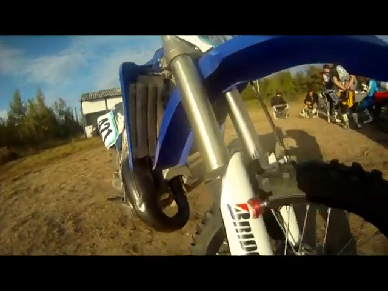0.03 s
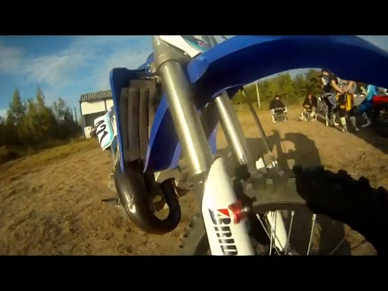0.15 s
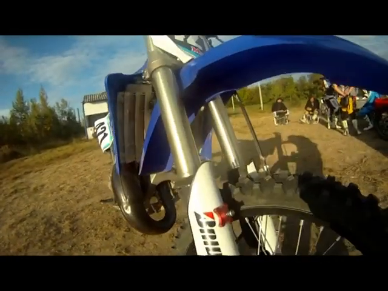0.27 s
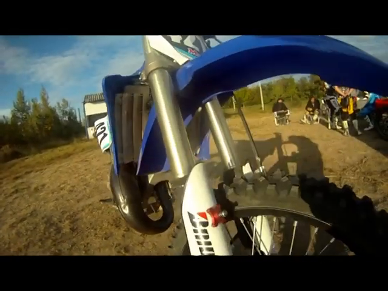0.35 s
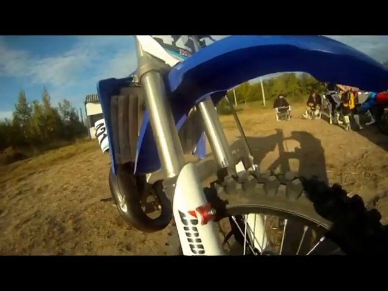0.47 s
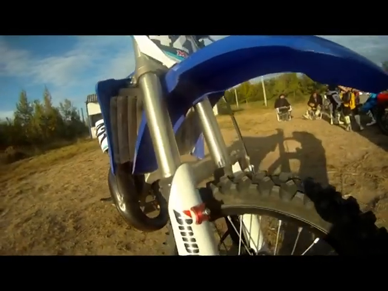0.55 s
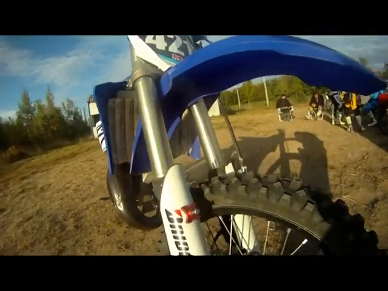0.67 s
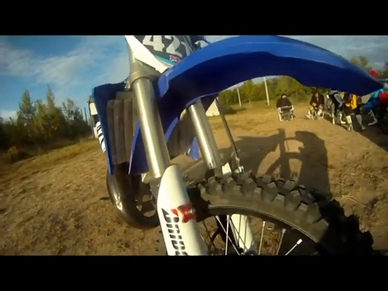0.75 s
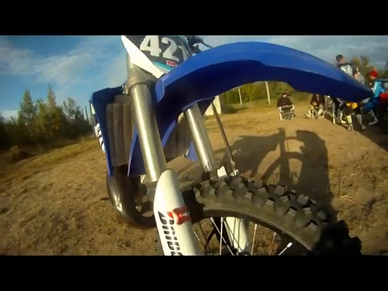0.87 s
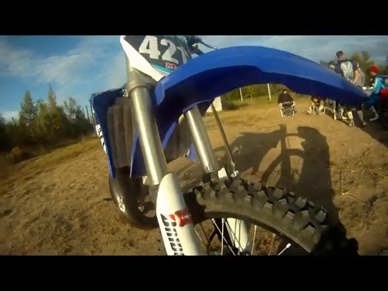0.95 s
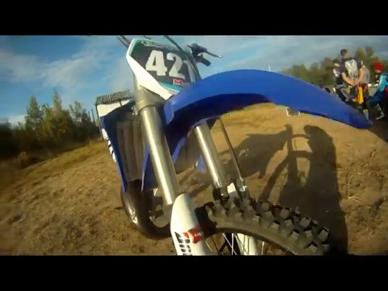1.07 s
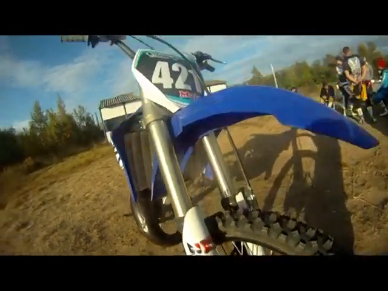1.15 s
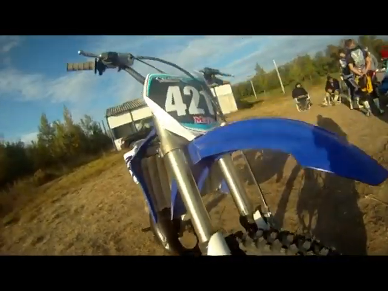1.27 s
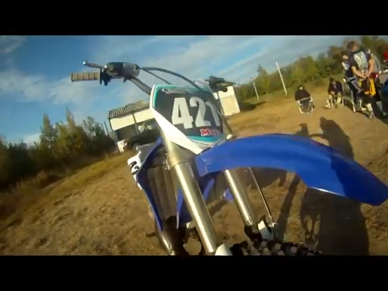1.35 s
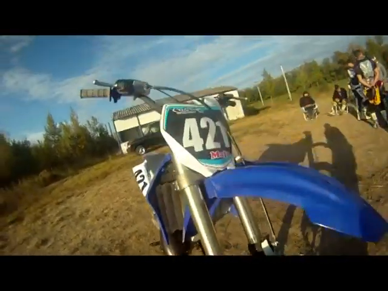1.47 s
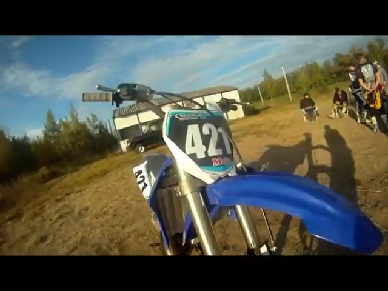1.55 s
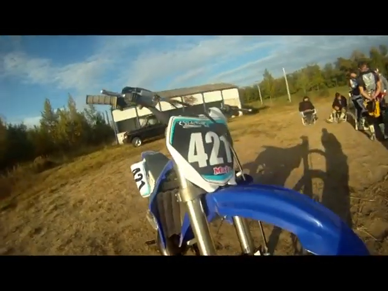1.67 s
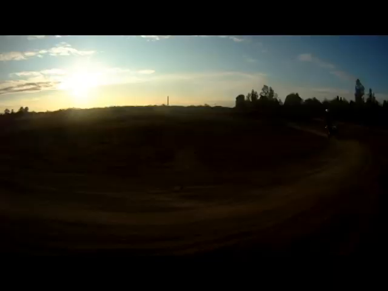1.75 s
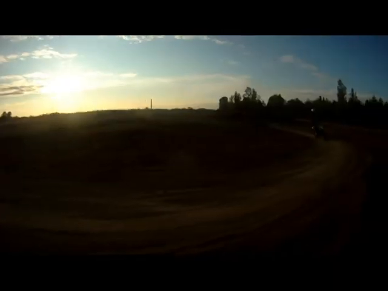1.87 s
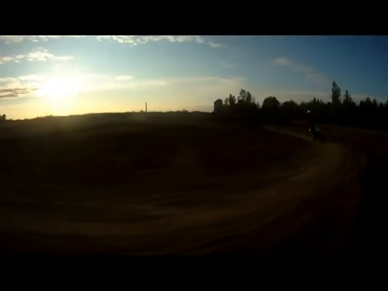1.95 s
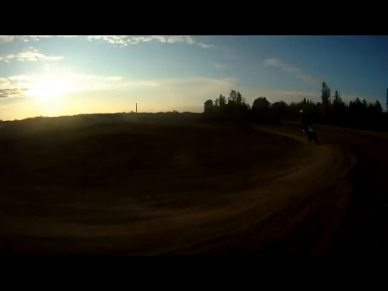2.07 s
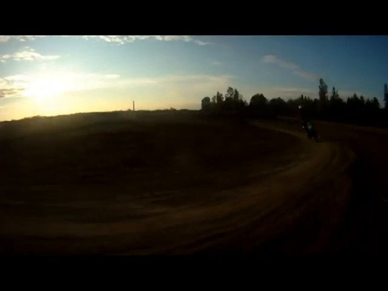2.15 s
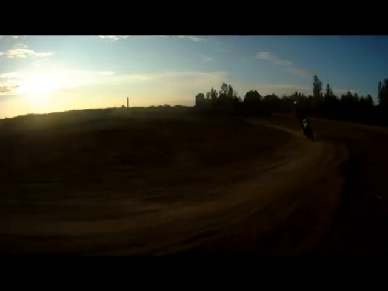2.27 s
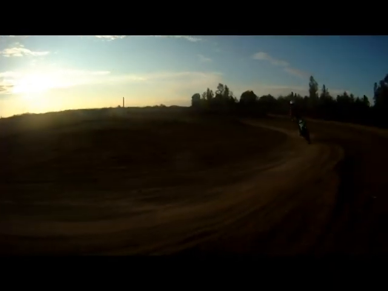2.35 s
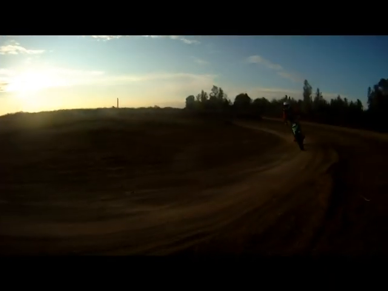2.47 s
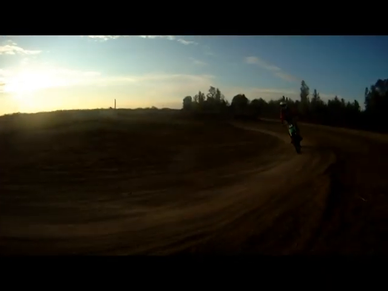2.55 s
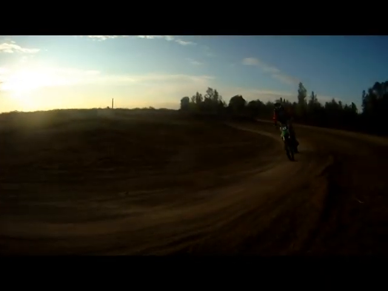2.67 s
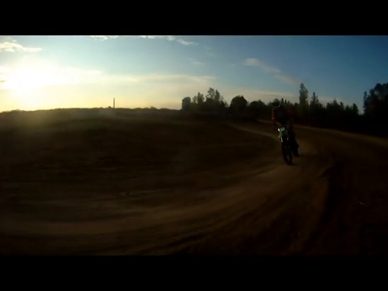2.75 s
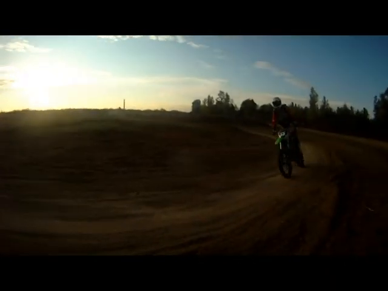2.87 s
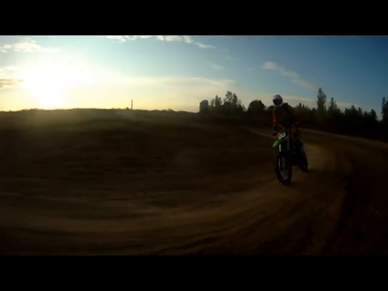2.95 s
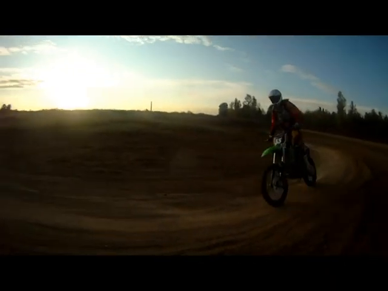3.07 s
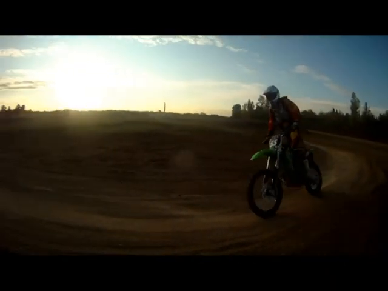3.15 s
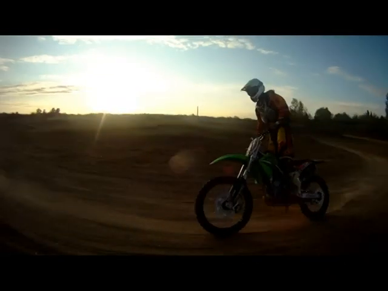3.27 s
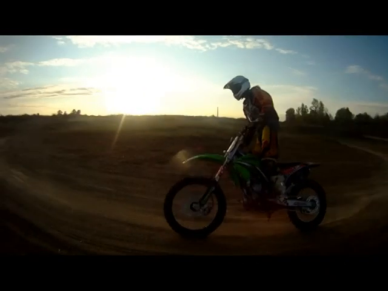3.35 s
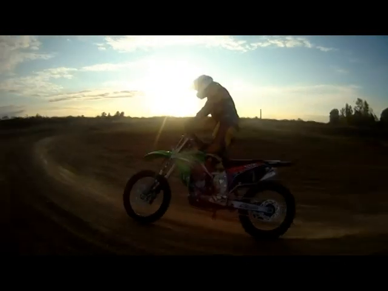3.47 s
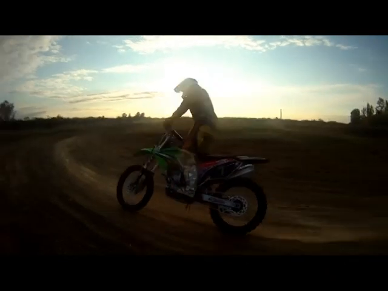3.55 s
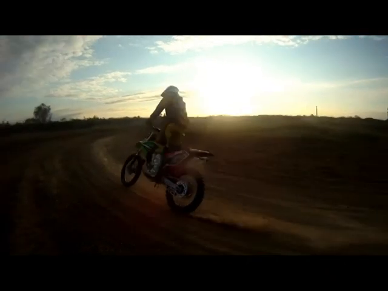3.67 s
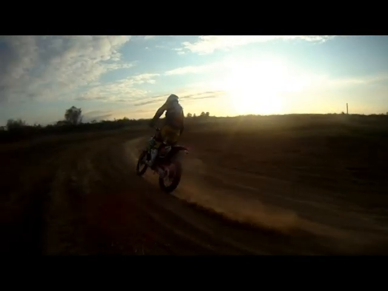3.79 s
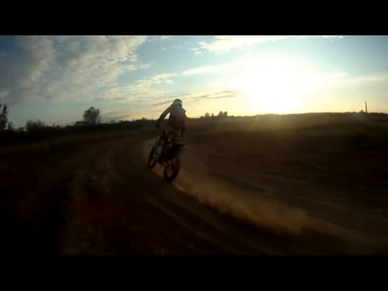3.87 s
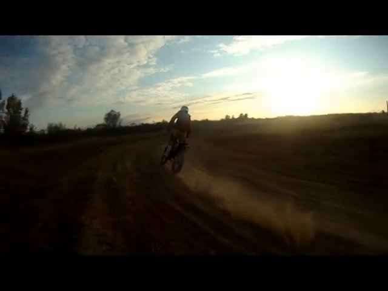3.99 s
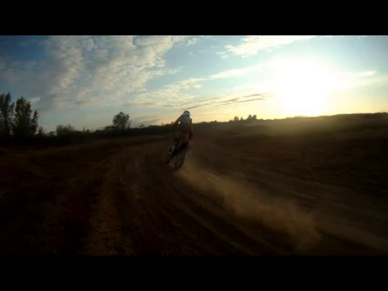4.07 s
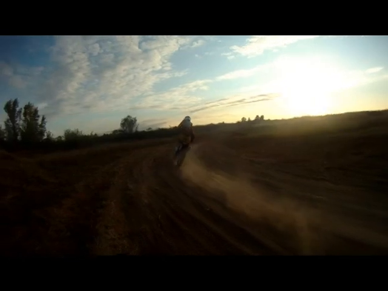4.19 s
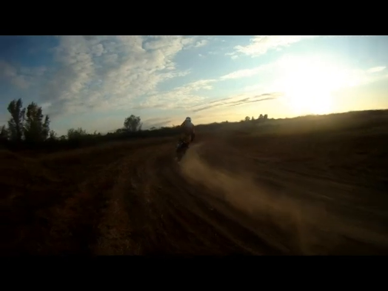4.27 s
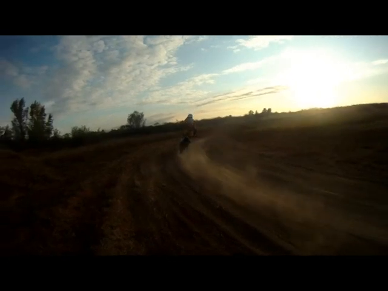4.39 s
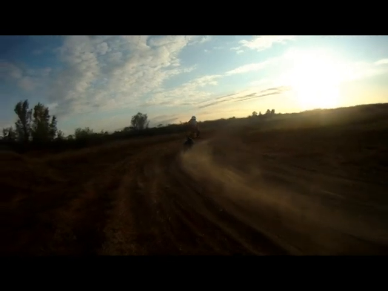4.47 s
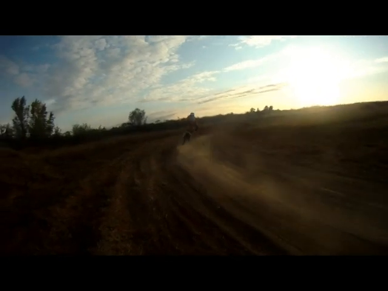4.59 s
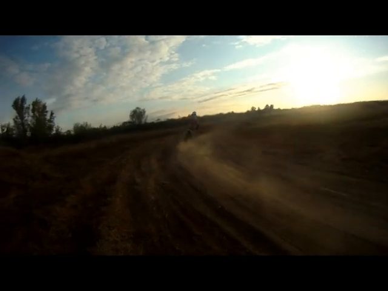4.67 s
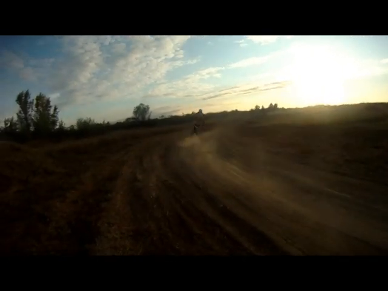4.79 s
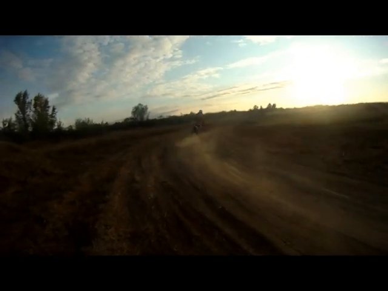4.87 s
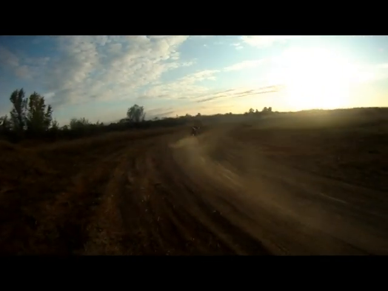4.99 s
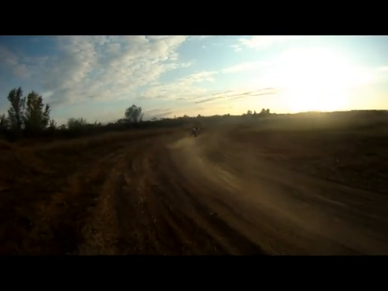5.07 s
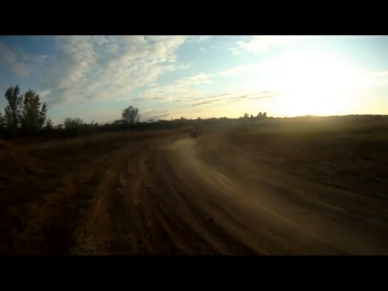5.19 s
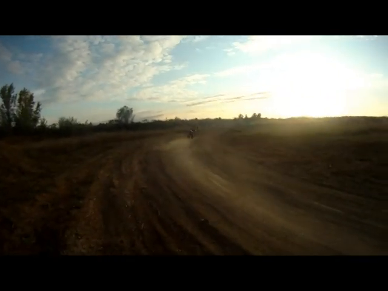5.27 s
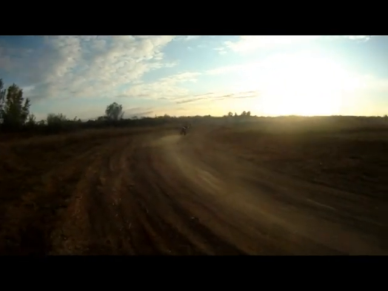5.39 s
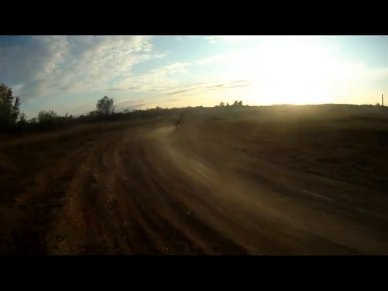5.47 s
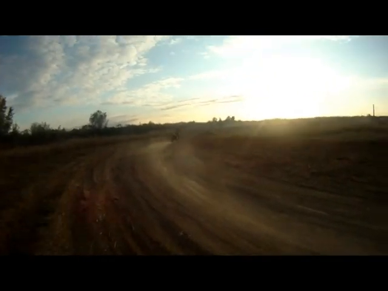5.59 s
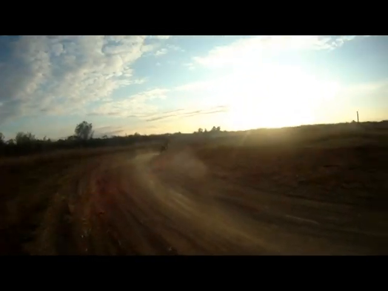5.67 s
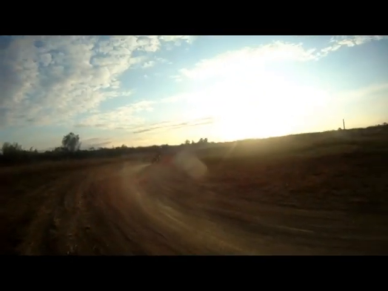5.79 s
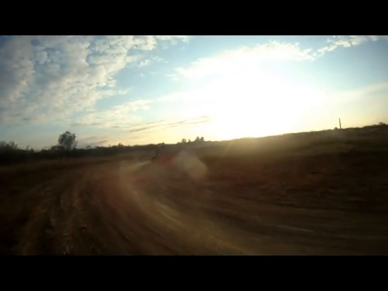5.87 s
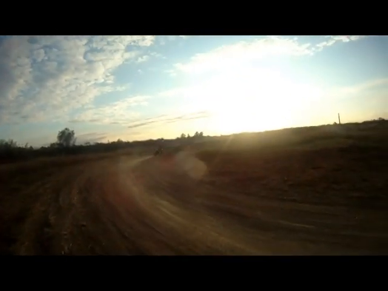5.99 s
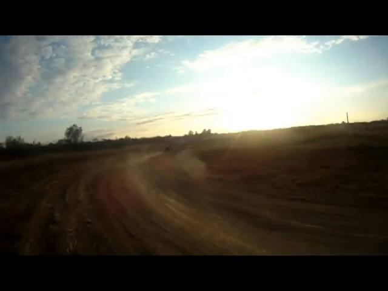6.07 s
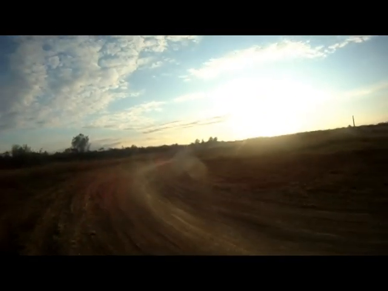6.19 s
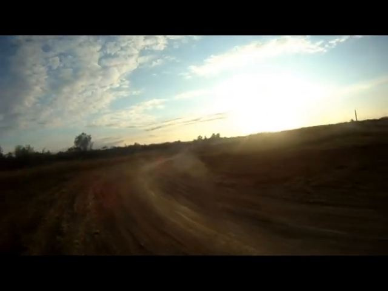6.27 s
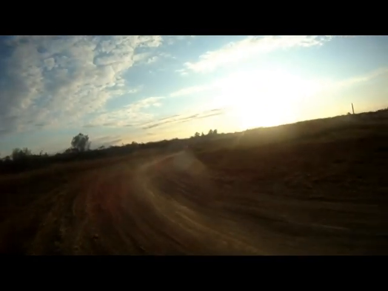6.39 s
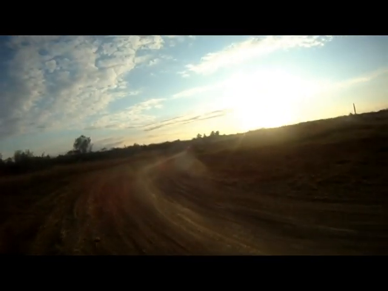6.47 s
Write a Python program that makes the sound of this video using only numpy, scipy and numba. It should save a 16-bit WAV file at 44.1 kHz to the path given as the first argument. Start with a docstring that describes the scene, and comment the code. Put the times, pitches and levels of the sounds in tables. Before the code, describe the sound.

Heard outdoors through a closed camera case, soft wind, rubbing cloth and a distant engine stop abruptly. After a tiny gap, a single-cylinder dirt bike thumps closer and revs loudly as it goes by. The throttle shuts, the exhaust stutters and pops, and the bike recedes with two short revs, a light spray of soil and a stone ticking on the case.

```python
"""A four-stroke single-cylinder dirt bike rides past, heard through the closed case of an action camera.
Each firing thumps the pipe and puffs out gas that rings the case. The bike rolls up, passes close with a
burst of throttle, burbles and pops on the overrun and leaves with two more blips, flinging dirt.
Before it, cut off by a short silence, comes a moment in the paddock: wind on the case, rustling cloth,
two soft knocks and another bike droning far off."""
import sys
import numpy as np
from scipy import signal
from scipy.fft import rfft, irfft
from scipy.io import wavfile
from scipy.ndimage import uniform_filter1d
from numba import njit

SR = 44100
rng = np.random.default_rng(int(sys.argv[2]) if len(sys.argv) > 2 else 0)


def unload_wav(signal):
    """Save mono or channel-first audio to the path in sys.argv[1] as 16-bit WAV at rate SR, clipped to [-1, 1]."""
    wavfile.write(
        sys.argv[1],
        SR,
        np.round(np.clip(np.atleast_2d(signal).T, -1, 1) * 32767).astype(np.int16),
    )


N = 288298
TIME = np.arange(N) / SR
PADDOCK_END_S, RIDE_START_S, RIDE_END_S = 1.808, 2.02, 6.01
SPEED_M_S, NEAREST_M, CLOSEST_S = 7.68, 2.11, 3.643
TURN_S = 3.66  # the bike turns its tail to the listener

# exhaust pops on the overrun, stone ticks under throttle: start_s, level_db, crack_offset_db
POPS_AND_TICKS = [(2.037, -59, 1.5), (2.402, -53.5, -15), (2.494, -56.5, -8), (4.024, -52, 8),
                  (4.05, -50, 14.5), (4.076, -47.5, 5.5), (4.129, -51, 10), (4.177, -46.5, 5.5),
                  (4.205, -53, 6.5), (4.278, -54, 7.5), (4.38, -48.5, 5), (4.669, -54, 7),
                  (4.707, -51.5, -2), (4.944, -60, 14), (5.007, -59.5, 10)]
# what the closed case lets through: frequency_hz, gain_db
CASE_EQ = [(400, -18), (620, 7), (800, -0.5), (1000, 1), (1400, -8.5), (1850, -4), (2150, 4.5),
           (2700, -0.5), (3650, 0.5), (4300, -3.5), (5200, -3.5), (7000, -6), (8300, -6.5), (9300, -11.5),
           (12500, -23), (15000, -3)]


def undb(db):
    """Decibels to amplitude."""
    return 10 ** (np.asarray(db) / 20)


def curves(table):
    """The columns of a table, joined by straight lines in time."""
    times, *columns = np.transpose(table)
    return [np.interp(TIME, times, column) for column in columns]


def noise():
    """White noise."""
    return rng.standard_normal(N)


def unit(x, band_hz):
    """Scale to rms 1 within a band."""
    return x / np.std(signal.sosfilt(signal.butter(3, band_hz, "band", fs=SR, output="sos"), x))


def wander(rate_hz):
    """Smooth random drift with a spread near 1."""
    hold = int(SR / rate_hz)
    steps = np.repeat(rng.standard_normal(N // hold + 1), hold)
    return 1.5 * uniform_filter1d(uniform_filter1d(steps, hold), hold)[:N]


def colour(x, points, size=8192):
    """Minimum-phase EQ through (frequency_hz, gain_db) points."""
    hz, db = np.transpose(points)
    bins_hz = np.fft.rfftfreq(size, 1 / SR)
    log_gain = np.log(undb(np.interp(np.log(bins_hz + 1), np.log(hz), db)))
    cepstrum = irfft(log_gain)[:size // 2]
    cepstrum[1:] *= 2
    impulse = irfft(np.exp(rfft(cepstrum, size)))[:size // 2]
    return signal.fftconvolve(x, impulse)[:N]


@njit
def bandpass(x, hz, width_hz):
    """State-variable band-pass with a moving centre."""
    y, band_state, low_state = np.empty(len(x)), 0., 0.
    for i in range(len(x)):
        g, damping = np.tan(np.pi * hz[i] / SR), width_hz / hz[i]
        band = (band_state + g * (x[i] + 1e-18 - low_state)) / (1 + g * (g + damping))
        band_state, low_state = 2 * band - band_state, low_state + 2 * g * band
        y[i] = damping * band
    return y


def ring(x, hz, width_hz, order=1):
    """A resonance, applied order times."""
    for _ in range(order):
        x = bandpass(x, hz * np.ones(N), float(width_hz))
    return x


def burst(age, rise_s):
    """Envelope that rises to 1 in rise_s and dies away."""
    u = np.clip(age / rise_s, 0, 50)
    return u * np.exp(1 - u)


def firings(rate_hz, scatter_db, offset_cycles=0):
    """One uneven pulse per engine cycle; also its strength and the seconds since it fired."""
    cycle = np.maximum.accumulate(np.cumsum(rate_hz) / SR + offset_cycles).astype(int)
    strength = undb(scatter_db * rng.standard_normal(400)[cycle])
    fired = np.diff(cycle, prepend=0) > 0
    return fired * strength, strength, TIME - np.maximum.accumulate(TIME * fired)


def bearing(lead_s=0):
    """Nearness (1 at the nearest point) and the side that the bike shows (-1 front, 1 rear)."""
    along = SPEED_M_S * (TIME - CLOSEST_S + lead_s)
    distance = np.hypot(along, NEAREST_M)
    return NEAREST_M / distance, along / distance


def radiated(throttle, base_db, open_db, rear_db, side_db, lead_s=0):
    """Gain of a bike part: up with open throttle, down with distance, shaded by the side it shows."""
    near, rear = bearing(lead_s)
    return near * undb(base_db + open_db * throttle + rear_db * rear + side_db * near ** 2)


def wind():
    """Wind rumbles on the case: a steady breeze, three gusts and a last low swell."""
    # wind rumble: frequency_hz, gain_db
    rumble_eq = [(10, -1), (24, 0), (55, -5.5), (90, -22.5), (140, -22.5), (400, -34), (1500, -57.5)]
    # gusts: start_s, level_db
    gusts = [(-.015, -36), (.985, -48), (1.565, -52.5)]
    envelope = undb(-51.5) + sum(undb(db) * burst(TIME - s, .013) for s, db in gusts)
    last_swell = -undb(-30) * burst(TIME - 1.798, .009)
    return unit(colour(noise(), rumble_eq), (20, 90)) * envelope + last_swell


def far_bike():
    """A distant engine's firings blur into a drone that rises and falls."""
    # distant revving: time_s, firing_rate_hz, level_db
    far_revs = [(0, 46, -86), (.45, 60, -69.5), (.7, 51, -70.5), (1.0, 55.4, -72.5), (1.2, 56, -62.5),
                (1.45, 53.8, -69), (1.65, 58, -68), (1.81, 57, -64)]
    rate_hz, level_db = curves(far_revs)
    smeared = firings(rate_hz, scatter_db=3.5)[0] + .007 * noise()
    drone = ring(ring(smeared, 224, 109), 207, 230, order=2)
    return unit(drone, (160, 330)) * undb(level_db)


def cloth():
    """Cloth rubs close to the case; each stroke swells, holds and dies away over a faint steady rub."""
    # strokes of cloth: start_s, hold_s, level_db
    strokes = [(0.084, .025, -63), (0.29, .02, -66.5), (0.377, 0.0089, -66.5), (0.516, 0.011, -70),
               (0.866, 0.0088, -68), (0.932, 0.011, -65.5), (1.014, 0.0066, -78), (1.326, 0.032, -58.5),
               (1.453, 0.19, -57.5), (1.659, 0.1, -68)]
    # tone of the cloth: frequency_hz, gain_db
    cloth_eq = [(300, -16), (700, -3), (1000, 2), (1300, 12.5), (2000, 2.5), (2900, 0.5), (4200, -7),
                (7900, -13), (10000, 7.5), (11500, -7), (14000, 7.5), (15000, -4.5)]
    # resonances that the rubbing wakes: pitch_hz, width_hz, gain_db
    resonances = [(1370, 78.2, -4), (1940, 96, 2), (3505, 65, 5.5), (4700, 100, -4), (7170, 91, -4.5),
                  (8360, 78, -3.5)]
    rest_db, rise_db_per_s, fall_db_per_s = -75, 378, 424
    rub = noise() * undb(1.6 * wander(180))
    fibres = colour(colour(rub, CASE_EQ), cloth_eq)
    ringing = sum(undb(db) * ring(rub, hz, width) for hz, width, db in resonances)
    level_db = rest_db
    for start_s, hold_s, db in strokes:
        before, after = np.maximum(start_s - TIME, 0), np.maximum(TIME - start_s - hold_s, 0)
        level_db = np.maximum(level_db, db - rise_db_per_s * before - fall_db_per_s * after)
    return unit(fibres + ringing, (1000, 5000)) * undb(level_db)


def knocks():
    """Soft knocks on the case: a low thud with a short noisy tap."""
    # knocks: start_s, force_db
    hits = [(.266, -46), (1.014, -43)]
    force = sum(undb(db) * burst(TIME - s, .0008) for s, db in hits)
    return undb(12.5) * ring(force, 215, 70) + undb(-1) * ring(force * noise(), 1000, 600)


def dirt():
    """The rear tyre sprays soil, and a flung stone ticks on the case."""
    # sprays of soil: start_s, length_s, level_db
    sprays = [(4.026, 0.027, -52), (5.758, .06, -63)]
    # stone strike: start_s, force_db
    stones = [(5.8378, -21)]
    envelope = sum(undb(db) * burst(TIME - s, length / 4) for s, length, db in sprays)
    spray = envelope * unit(ring(noise(), 4600, 5100, order=2), (2000, 8000))
    tick = sum(undb(db) * burst(TIME - s, .0003) for s, db in stones) * noise()
    return spray + 2 * ring(tick, 1900, 2400, order=2) + undb(-10) * ring(tick, 12000, 6000)


def pops_and_ticks():
    """Exhaust pops and stone ticks: each a short hollow bang with a little crack on top."""
    bang_gain = sum(undb(db) * burst(TIME - s + .001, .002) for s, db, _ in POPS_AND_TICKS)
    crack_gain = sum(undb(db + crack_db) * burst(TIME - s, .003) for s, db, crack_db in POPS_AND_TICKS)
    bang = bang_gain * unit(ring(noise(), 1000, 450, order=2), (700, 1600))
    crack = crack_gain * unit(colour(noise(), CASE_EQ), (2000, 6000))
    return undb(-3) * bang + undb(-11.5) * crack


def rasp(strength, age, throttle):
    """A puff of gas follows every firing; chain and engine clatter on; both ring the camera case."""
    # narrow rings of the case, bike seen from front or rear: pitch_hz, width_hz, front_db, rear_db
    case_modes = [(1292, 170, 4, -1.5), (1760, 37, -8, -6), (1990, 220, -14.5, -4.5), (2120, 100, 2, 4),
                  (2398, 130, -1, -12), (3240, 150, 2, -13), (3440, 100, 0, -7), (3698, 79, -6, 9),
                  (8270, 150, -2.5, 1), (9580, 230, -6, -5), (14000, 1000, -3, -1)]
    gas = noise() * strength * burst(age - .0015, .003)
    clatter = noise() * undb(1.8 * wander(260))
    gas_gain = radiated(throttle, base_db=-76.5, open_db=37.5, rear_db=1.5, side_db=8, lead_s=-.0371)
    clatter_gain = radiated(throttle, base_db=-57.5, open_db=9, rear_db=5.5, side_db=8.5, lead_s=.4236)
    gain = np.hypot(gas_gain, clatter_gain)
    drive = (gas_gain * gas / gas.std() + clatter_gain * clatter / clatter.std()) / gain
    behind = .5 + .5 * np.tanh((TIME - TURN_S) / .11)
    case_ring = sum(undb(front + (rear - front) * behind) * ring(drive, hz, width)
                    for hz, width, front, rear in case_modes)
    pipe_mouth = undb(-11.5) * unit(ring(gas, 1760, 960, order=2), (1200, 2200))
    return unit(colour(drive, CASE_EQ) + case_ring, (1400, 5200)) * gain + pipe_mouth * gas_gain


def intake(pulses, throttle):
    """The air box honks once a cycle, heard only from the front."""
    honk = -unit(ring(ring(pulses, 354, 56), 413, 170), (280, 420))
    facing = np.clip((TURN_S - TIME) / .2, 0, 1)
    return honk * facing * radiated(throttle, base_db=-59.5, open_db=5, rear_db=2, side_db=5, lead_s=.63)


def exhaust_bark(pulses, rate_hz, throttle):
    """The midrange bark grows with revs and sounds higher close by; rough ground scatters some back."""
    cruise_hz, db_per_doubling = 40.5, 9
    lift = 1 + .13 * bearing()[0] ** 2
    modes = ring(pulses, 570 * lift, 210) + undb(-12) * ring(pulses, 517 * lift, 170)
    direct = -unit(ring(modes, 450 * lift, 380, order=2), (450, 700))
    scattered = undb(-12) * unit(ring(noise(), 450 * lift, 260, order=2), (450, 700))
    gain = radiated(throttle, base_db=-70, open_db=29.5, rear_db=4.5, side_db=1.5)
    return (direct + scattered) * gain * undb(db_per_doubling * np.log2(rate_hz / cruise_hz))


def exhaust_thump(pulses, rate_hz, throttle):
    """Each firing thumps the pipe, whose note rises with revs and gas heat; air buffets the case."""
    heat = np.tanh(throttle / .45)  # levels off as the throttle opens
    pipe_hz = 120.8 + .9 * rate_hz + 42.9 * heat + 2.5 * bearing()[1]  # a little higher from behind
    modes = ring(pulses, pipe_hz, 56) + undb(-20) * ring(pulses, 1.3 * pipe_hz, 130)
    muffled = signal.sosfilt(signal.butter(3, 300, fs=SR, output="sos"), ring(modes, pipe_hz, 130))
    thump_gain = radiated(throttle, base_db=-40.5, open_db=6.5, rear_db=2.5, side_db=-8)
    sub_gain = radiated(throttle, base_db=-48.5, open_db=7, rear_db=0, side_db=.5, lead_s=-.04)
    thump = -unit(muffled, (130, 340)) * thump_gain
    sub = -unit(ring(ring(pulses, 79, 50), 71, 87), (45, 110)) * sub_gain
    low = thump + sub
    low -= .13 * ring(low, 122, 27)  # the silencer damps a narrow band below the pipe note
    buffet = unit(ring(noise(), 34, 50, order=2), (25, 110))
    return low + buffet * (undb(-59.5) + undb(-16.5) * sub_gain)


def passing_bike():
    """The engine rides past; off the throttle it stumbles, firing unevenly and harder where it pops."""
    # engine speed: time_s, firing_rate_hz
    revs = [(2.02, 34.49), (3.08, 38.62), (3.32, 44.48), (3.59, 44.05), (3.7, 58.75), (3.83, 52.62),
            (3.94, 39.75), (4.52, 38.86), (4.6, 46.67), (4.72, 42.47), (5.04, 46.08), (5.12, 39.41),
            (5.32, 54.15), (5.43, 39.03), (6.0, 41.72)]
    # twist grip: time_s, opening (0 shut, 1 full)
    twist_grip = [(2.1, 0.54), (2.6, 0.51), (3.15, 0.29), (3.58, 0.49), (3.7, 0.87), (3.79, 0.91),
                  (3.85, 0.58), (3.91, 0.16), (4.5, 0.01), (4.58, 0.44), (4.85, 0.46), (4.95, 0.7),
                  (5.02, 0.72), (5.07, 0.4), (5.12, .2), (5.2, 0.58), (5.45, 0.61), (5.9, 0.72)]
    # the engine misses as the throttle moves: time_s, dip_db
    misses = [(3.868, -6), (4.5, -2.5), (5.065, -2)]
    miss_s, fade_in_s, fade_out_s = .027, .17, .19
    rate_hz, throttle = curves(revs)[0], curves(twist_grip)[0]
    stumble = (1 - throttle) ** 8
    timing = .14 - .07 * stumble + (.004 + .03 * stumble) * wander(40)
    pulses, strength, age = firings(rate_hz * (TIME >= RIDE_START_S), .7 + 1.2 * stumble, timing)
    popping = sum(abs(TIME - s) < .012 for s, _, _ in POPS_AND_TICKS)
    miss_db = sum(db * np.exp(-((TIME - s) / miss_s) ** 2) for s, db in misses)
    pulses *= undb(stumble * (6.5 * popping - .6) + miss_db)
    exhaust = exhaust_bark(pulses, rate_hz, throttle) + exhaust_thump(pulses, rate_hz, throttle)
    fade = np.clip(np.minimum((TIME - RIDE_START_S) / fade_in_s, (RIDE_END_S - TIME) / fade_out_s), 0, 1)
    return fade * (exhaust + intake(pulses, throttle) + rasp(strength, age, throttle))


def scene():
    """The paddock cuts off with a click in mid-gust; after a silence the bike rides past."""
    paddock = (wind() + far_bike() + cloth() + knocks()) * (TIME < PADDOCK_END_S)
    return (paddock + passing_bike() + pops_and_ticks() + dirt())[None]


def record(dry):
    """The case adds a hollow echo and swallows 6 kHz; the converter adds a faint image around 12 kHz."""
    echo_s, top_hz = 1 / 265, 15200
    x = dry[0]
    above_bass = signal.sosfiltfilt(signal.butter(2, 240, "high", fs=SR, output="sos"), x)
    x = x + .63 * np.interp(TIME - echo_s, TIME, above_bass, left=0)
    x = x - .93 * ring(x, 6000, 1400)
    x = x - .9 * ring(x, 12000, 900)
    x = x + undb(-11.5) * ring(x, 770, 370) * np.cos(2 * np.pi * 12000 * TIME)  # mirrored midrange
    return signal.sosfilt(signal.ellip(8, .2, 70, top_hz, fs=SR, output="sos"), x)[None]


dry = scene()
out = record(dry)
unload_wav(out)
```